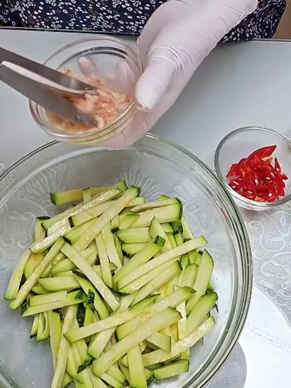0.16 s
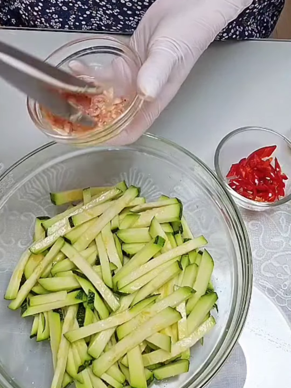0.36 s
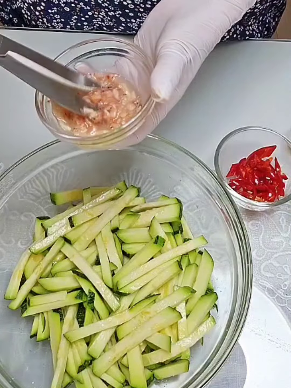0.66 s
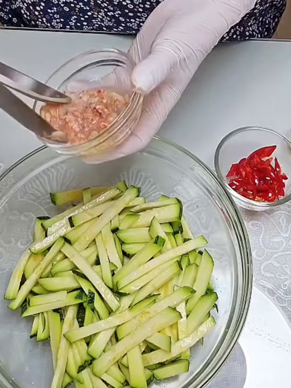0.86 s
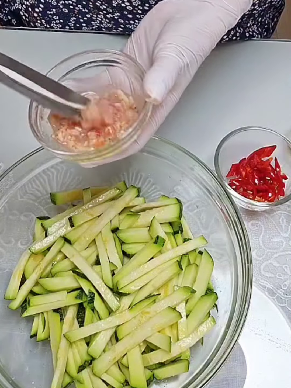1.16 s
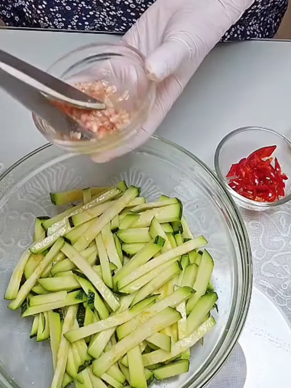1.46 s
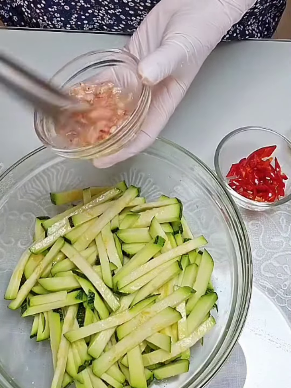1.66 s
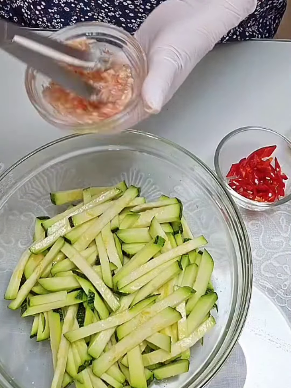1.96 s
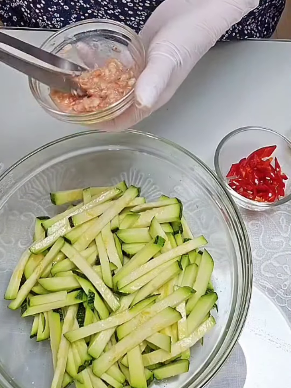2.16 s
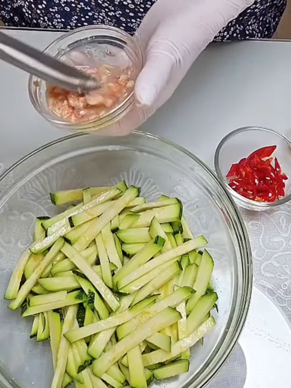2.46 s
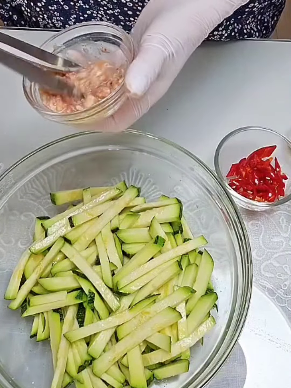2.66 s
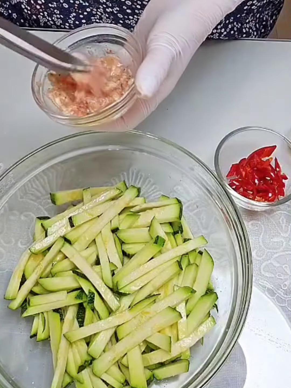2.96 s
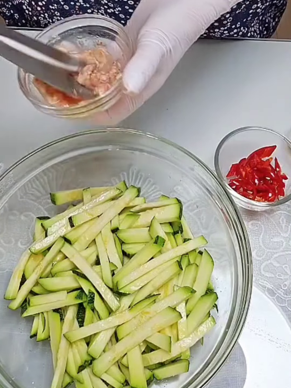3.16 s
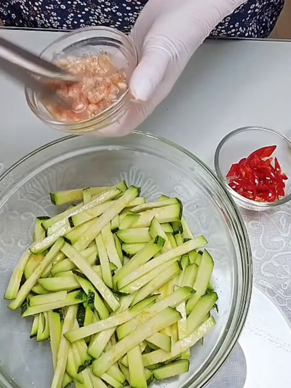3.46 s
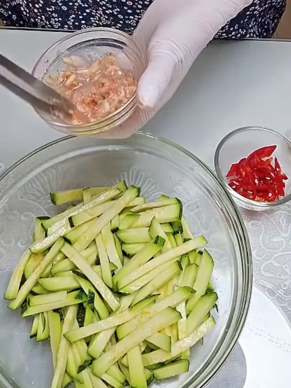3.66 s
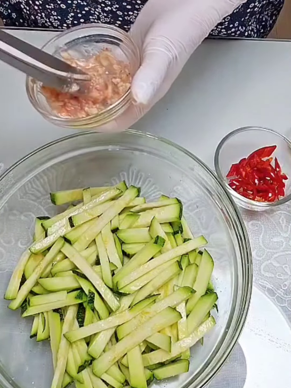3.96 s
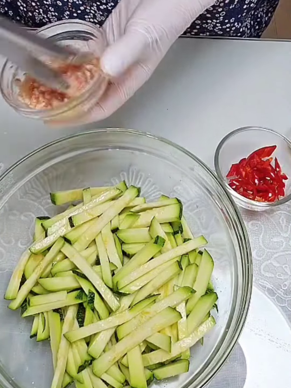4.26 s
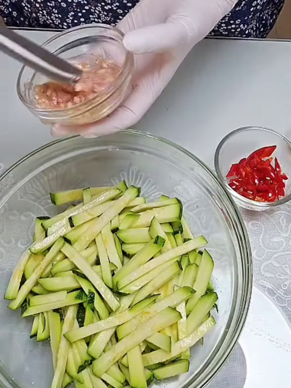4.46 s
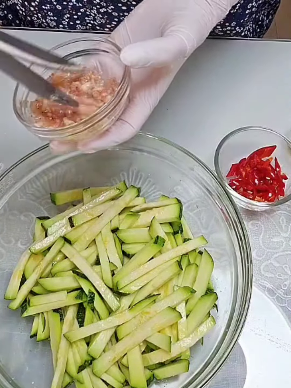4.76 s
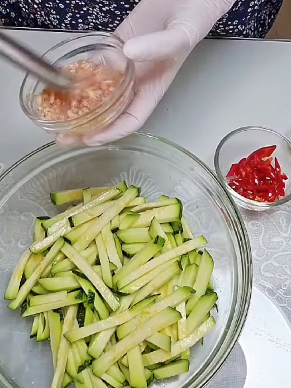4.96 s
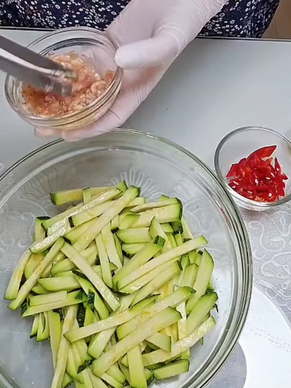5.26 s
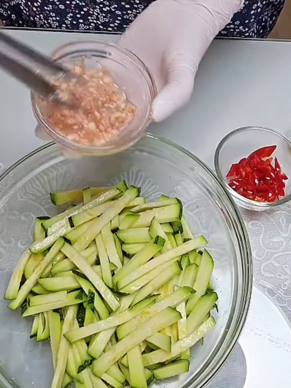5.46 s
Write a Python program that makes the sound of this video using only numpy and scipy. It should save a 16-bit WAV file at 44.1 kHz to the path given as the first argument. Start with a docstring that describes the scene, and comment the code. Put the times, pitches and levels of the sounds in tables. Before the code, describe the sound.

Close, dry, grainy scissor strokes in a hand-held glass bowl, a few bright glass taps, over quiet kitchen room noise and faint low hum.

```python
"""In a kitchen, close up, scissors snip quickly through wet minced food in a small hand-held glass bowl.
Each stroke is a short burst of grainy noise, coloured as steel and partly as damped glass modes.
Now and then a blade tip clinks on the glass: a tap, noisy chatter, a thud in the palm and a room wash.
Faint stirring fills in; a low appliance hum wavers over room noise with a dull band and a thin whistle."""
import sys
import numpy as np
from scipy import signal
from scipy.fft import rfft, irfft
from scipy.io import wavfile
from scipy.ndimage import uniform_filter1d

SR = 44100
rng = np.random.default_rng(int(sys.argv[2]) if len(sys.argv) > 2 else 0)


def voltage_ratio(level):
    """Linear amplitude factor for a level in decibels (scalar or array-like)."""
    return 10 ** (np.asarray(level, float) / 20)


def waveform_to_disk(signal):
    """Save audio, clipped to [-1, 1], as 16-bit WAV at the path in sys.argv[1]."""
    frames = np.transpose(np.atleast_2d(signal))
    scaled = np.clip(frames, -1, 1) * 32767
    samples = np.round(scaled).astype(np.int16)
    wavfile.write(sys.argv[1], SR, samples)


N = 247401
SIZE = 8192  # samples per touch
T = np.arange(SIZE) / SR
F = np.maximum(np.fft.rfftfreq(SIZE, 1 / SR), 1)


def snips():
    """Scissor strokes: fibres part and steel scrapes as the blades close."""
    # blade strokes: (half-rise time [s], nominal length [s], level [dB],
    # brightness before weighting [dB], glass ring [dB])
    strokes = [(0.0, 0.0075, -79, 3, -7), (0.12, 0.0096, -69, 9.5, -0.5), (0.295, .01, -75, -14.5, -7),
               (0.303, 0.033, -81.5, -16, 1.5), (0.355, .008, -75.5, 8, 1.5), (.368, 0.0062, -71.5, 4, -14),
               (.415, 0.014, -70.5, 1, -16), (.45, 0.022, -72.5, 5, -11), (0.503, 0.022, -57, 2.5, 9),
               (0.539, 0.012, -71.5, -2.5, -20), (0.596, 0.0089, -74, 1.5, -14),
               (0.614, 0.018, -74, 3, -16), (0.687, 0.022, -75, -2.5, -22), (0.725, 0.018, -79.5, 2, -11),
               (0.788, 0.03, -78.5, -2.5, -17), (0.828, 0.038, -78.5, 1.5, -17),
               (0.876, 0.019, -63.5, -2.5, 7.5), (0.9, .011, -74, -7.5, -18), (0.99, 0.024, -78.5, 2, -14),
               (1.064, .019, -70, 2.5, -25), (1.153, 0.034, -63, -2.5, -1), (1.197, .031, -72.5, 5.5, -11),
               (1.273, 0.031, -83, -13.5, 5), (1.299, 0.0062, -67, -2.5, -14),
               (1.386, 0.031, -66.5, -14.5, 2), (1.452, 0.024, -78.5, 0, -12), (1.503, 0.023, -74, -5, -7),
               (1.551, 0.039, -81.5, 1, -14), (1.593, 0.023, -65, -3.5, -1), (1.617, 0.029, -65, -3.5, -27),
               (1.679, 0.038, -61, -2.5, 7), (1.791, 0.029, -81, -2, -14), (1.88, 0.05, -75.5, -3, -7),
               (1.922, 0.021, -73.5, 8, -19), (1.989, 0.043, -65, -6.5, -4.5), (2.038, 0.013, -69, 6, -3.5),
               (2.233, 0.032, -71.5, 0.5, -27), (2.287, 0.029, -65.5, -9, -25),
               (2.324, 0.033, -74, -3, -11), (2.442, 0.025, -82, -11, -6), (2.49, 0.0083, -69, 7, -3),
               (2.547, 0.028, -68.5, -4, -27), (2.59, .032, -78, 0, -17), (2.64, 0.028, -65.5, -1, -0.5),
               (2.687, 0.026, -77, 0.5, -11), (2.733, 0.024, -78, 4, -14), (2.803, 0.014, -71, -11, -1),
               (2.861, 0.0089, -69, 6, -14), (2.935, 0.029, -80.5, -3, -13), (2.99, 0.026, -83.5, 1, -20),
               (3.061, 0.043, -80, -3.5, -18), (3.104, 0.019, -69, 12, 4.5), (3.173, 0.029, -60, -2.5, -3),
               (3.227, .009, -76.5, 4, -4), (3.296, 0.019, -83, -14, -13), (3.336, 0.016, -78, 4.5, -10),
               (3.408, 0.03, -66.5, -6.5, -4.5), (3.455, 0.013, -75.5, 8, -11),
               (3.526, 0.027, -73, -8.5, 6), (3.659, 0.024, -47, -3.5, 6), (3.686, 0.023, -61.5, -3, -11),
               (3.804, .045, -74, -10.5, -19), (3.863, 0.014, -79, 5.5, -16),
               (3.916, 0.028, -58.5, -6.5, -7.5), (3.96, .032, -74.5, 6, -2), (4.008, 0.029, -65, -1, 6.5),
               (4.038, 0.034, -67, -4.5, -1), (4.181, 0.014, -71, -8.5, 2), (4.277, 0.02, -89, -13, 9),
               (4.311, 0.022, -74, -1.5, -12), (4.359, 0.025, -83, 3, -10), (4.427, .025, -64.5, -1.5, -3),
               (4.498, 0.018, -75.5, 2, -17), (4.584, 0.022, -74, -2, -18), (4.684, 0.028, -69.5, -7, 2),
               (4.713, .016, -73, 1, -8.5), (4.828, 0.033, -81.5, 2, -18), (4.874, 0.015, -77.5, 6, -14),
               (4.914, 0.029, -57, -0.5, 8), (4.947, 0.03, -68, -3, -19), (5.079, 0.018, -73.5, -6, 0),
               (5.17, 0.021, -74, 0.5, 7.5), (5.263, 0.023, -83.5, 6, -12),
               (5.335, 0.019, -74.5, -1.5, -4.5)]
    out = np.zeros(N)
    for s, length_s, db, bright_db, glass_db in strokes:
        add_stroke(out, s, length_s, db, bright_db, glass_db)
    return out


def stirring():
    """Faint stirring of the food: weak strokes spread evenly with random jitter."""
    count = 50
    out = np.zeros(N)
    for i in range(count):
        s = (i + rng.random()) * N / SR / count
        db = -87 + 3 * rng.standard_normal()
        bright_db = 2.7 + 3 * rng.standard_normal()
        add_stroke(out, s, 0.025, db, bright_db, glass_db=-17.5)
    return out


def add_stroke(out, s, length_s, db, bright_db, glass_db):
    """Dense tiny ticks, as noise with a stepped level; pressure swells, then lets go."""
    grain = int(0.00075 * SR)
    ticks = rng.standard_normal(SIZE)
    ticks = ticks * voltage_ratio(0.5 * np.repeat(rng.standard_normal(SIZE), grain)[:SIZE])
    ticks = ticks * voltage_ratio(3.5 * np.repeat(rng.standard_normal(SIZE // 128), 128))  # clumps
    lead_s, swell_s = 0.26 * length_s, 0.53 * length_s
    fall_s = 0.0087 + 0.28 * length_s
    arch = np.sin(np.pi / 2 * np.clip(T / (2 * lead_s), 0, 1)) ** 2
    pressure = arch * np.exp(-np.maximum(T - lead_s - swell_s, 0) ** 2 / fall_s ** 2)
    hard_db = db + 57.5
    # where the glass rings, both ends of the scrape sink
    ends_db = -1.0 - 0.7 * max(glass_db + 2.5, 0)
    # hard strokes stir the 9 kHz shape
    third_db = -6.5 + 1.26 * max(hard_db, 0) + 0.3 * bright_db
    scrape, ring = contact(ends_db - 1.16 * bright_db, ends_db + 1.12 * bright_db, glass_db, third_db,
                           follow=0.1, scatter_db=4.5, hollow_db=1.5)
    # a hard stroke also rocks the bowl in the palm
    rock = voltage_ratio(-16.5 + 0.73 * hard_db) * rfft(unit(irfft(palm(550, 0.4))))
    source = rfft(ticks / ticks.std() * pressure)
    add(out, s - lead_s, voltage_ratio(db) * irfft(source * (scrape + ring + rock)))


def clinks():
    """Blade tip on glass: tap and chatter; a longer set wash time gives longer chatter, louder wash."""
    # blade-tip blows: (time [s], level as if 1 ms long [dB], low knock [dB], top hiss [dB],
    # glass ring [dB], t60 of the wash, also sets the chatter [s])
    blows = [(0.3036, -57, 10, -19, -3, 0.091), (2.0889, -68.5, 1.5, -26, 15.5, 0.08),
             (2.235, -62.5, -3, 10, -12, 0.063), (2.423, -35.5, 7.5, -14, -27, 0.076),
             (2.801, -53.5, 7.5, -0.5, 0, 0.11), (3.8432, -67, 16.5, -4, -11, 0.045),
             (4.179, -54.5, 0.5, -6.5, -6, 0.064), (4.2764, -76, 20.5, -23, 12, 0.15),
             (4.401, -26.5, -16.5, -17, 2.5, 0.055), (5.441, -28.5, -2.5, -6.5, 7, .068),
             (5.486, -24.5, -1, 4.5, 7.5, 0.31)]
    out = np.zeros(N)
    for s, db, low_db, top_db, glass_db, t60_s in blows:
        third_db = -4.0 + 0.45 * glass_db - 0.25 * top_db  # a ringing, dull blow favours 9 kHz
        chatter_s = 0.0077 * np.sqrt(t60_s)
        rattle = rng.standard_normal(SIZE) * (1 - np.exp(-T / 0.0011)) * np.exp(-T / chatter_s)
        rattle = rfft(unit(rattle))
        scrape, ring = contact(low_db, top_db, glass_db, third_db,
                               follow=0.4, scatter_db=1.5, hollow_db=2.0)
        # the tap rings the glass; the chatter after it is mostly steel noise
        steel = irfft((0.95 + rattle) * scrape)
        glass = irfft((1 + 0.46 * rattle) * ring)
        thud = unit(irfft((1 + rattle) * palm(200, 0.53)))
        steel = steel + voltage_ratio(-22 + 0.39 * low_db) * thud
        echo = room_wash(glass + 0.83 * steel, t60_s)
        add(out, s, voltage_ratio(db) * np.sqrt(0.001 * SR) * (steel + glass + echo))
    return out


def room_wash(sound, t60_s):
    """Kitchen reverberation: convolution with noise that builds up, then decays exponentially."""
    wash = rng.standard_normal(SIZE) * (1 - np.exp(-T / 0.013)) * 1000. ** (-T / t60_s)
    wash = unit(wash * np.clip(6 * (1 - T / T[-1]), 0, 1))  # fade the end
    gain = voltage_ratio(-7) * (t60_s / 0.27) ** (1.33 / 2)  # a longer wash is louder
    return gain * signal.fftconvolve(sound, wash)[:SIZE]


def contact(low_db, top_db, glass_db, third_db, follow, scatter_db, hollow_db):
    """Spectra of one touch: broad steel scrape and damped bowl modes, varied at random each time."""
    # colour of steel scraping inside the bowl: (frequency [Hz], gain [dB])
    steel_colour = [(200, -16.5), (500, -4), (950, -1), (1250, 0.5), (1550, 4), (2250, 3.5), (2720, -1),
                    (3200, 3), (4800, 8), (5700, 4), (6600, -1.5), (7500, 3), (8500, 9.5), (11400, -2),
                    (14500, 4.5), (15700, 3.5), (16100, -51.5)]
    # glass bowl, each ring shape a close group that dies away quickly: (nominal frequency [Hz], nominal level
    # [dB], t60 before scaling [s])
    modes = [(1760, -13, .03), (1975, -7, .05), (2017, -6, .07), (2290, -5, .025), (3500, -5, .02),
             (4872, -4, .045), (4925, 0, .07), (5038, -3, .045), (6620, -10, .03), (8420, -7, .025),
             (8780, -3, .04), (8865, 0, .065), (10940, -14, .03), (13590, -3, .05), (13653, -4, .065),
             (13760, -8, .035)]
    tilt = curve([(2600, low_db), (3100, 0.0048), (6500, 0.017), (9300, 0.98 * top_db), (12000, top_db)], F)
    # random bumps and dips vary the colour of each touch
    bumps_db = hollow_db * rng.standard_normal(36)
    ripple = curve(np.transpose([np.geomspace(300, 16000, num=36), bumps_db]), F)
    scrape = curve(steel_colour, F) * tilt * ripple
    middle = scrape[(F > 3000) & (F < 7500)]
    scrape = scrape / np.sqrt(2 * np.sum(middle ** 2) / SIZE)
    hz, db, t60_s = np.transpose(modes)[:, :, None]
    # each ring shape's pitch and decay vary a little at random
    hz = hz * (1 + 0.003 * rng.standard_normal(hz.shape))
    t60_s = 0.75 * t60_s * voltage_ratio(2.5 * rng.standard_normal(hz.shape))
    # the spot touched decides how much each ring shape is stirred
    spot = curve([(2400, follow * low_db), (3400, 0), (6800, 0), (8300, third_db), (11000, third_db),
                  (13500, 0.75 * top_db)], hz)
    gain = spot * voltage_ratio(db + scatter_db * rng.standard_normal(db.shape))
    ring = np.sum(gain * np.sin(2 * np.pi * hz * T) * 1000. ** (-T / t60_s), axis=0)
    ring = ring * (1 - np.exp(-T / 0.00095))  # the glass takes a few cycles to start
    ring = ring * (1 + 1.5 * np.exp(-T / 0.004))  # wet food soaks up the first loud swing fast
    return causal(scrape), voltage_ratio(glass_db) * rfft(unit(ring))


def palm(hz, log_width):
    """Spectrum of the bowl moving in the palm: one broad hump on a log-frequency axis."""
    return causal(np.exp(-np.log(F / hz) ** 2 / log_width ** 2))


def causal(gain):
    """Minimum-phase spectrum with this gain, so nothing sounds before the touch."""
    cep = irfft(np.log(gain + 1e-9))
    cep[1:SIZE // 2] *= 2
    cep[SIZE // 2 + 1:] = 0
    return np.exp(rfft(cep))


def curve(points, hz):
    """Gain of (Hz, dB) points joined on a log-frequency axis."""
    f, db = np.transpose(points)
    return voltage_ratio(np.interp(np.log(hz), np.log(f), db))


def unit(x):
    """Scales to unit energy."""
    return x / np.sqrt(np.sum(x ** 2))


def walk(rate_hz):
    """Random levels held 1 / rate_hz s and smoothed twice; standard deviation near 0.5."""
    k = int(SR / rate_hz)
    held = np.repeat(rng.standard_normal(N // k + 1), k)
    return 0.66 * uniform_filter1d(uniform_filter1d(held, k), k)[:N]


def add(out, s, sound):
    """Mixes one touch in at s seconds, cut at the end of the scene."""
    i = int(max(s, 0) * SR)
    out[i:i + SIZE] += sound[:N - i]


def hum():
    """Appliance hum: a low tone that throbs unevenly, swells, sinks and drifts, in a little rumble."""
    # hum before waver and throb: (time [s], level [dB])
    hum_levels = [(0.0, -62), (0.64, -59), (0.67, -69.5), (1.11, -54), (1.29, -69.5), (1.55, -53),
                  (1.64, -81), (1.67, -58.5), (3.84, -62), (4.0, -44.5), (4.05, -73.5), (4.3, -61),
                  (4.37, -45.5), (4.48, -63), (5.14, -62), (5.26, -77.5), (5.53, -52.5), (5.61, -66)]
    db = np.interp(np.arange(N) / SR, *np.transpose(hum_levels)) + 2.5 * walk(9.11)
    throb_hz = 11 * (1 + 0.798 * walk(6.5))
    throb = 1 + 0.64 * np.cos(2 * np.pi * np.cumsum(throb_hz) / SR)
    hz = 55 + 1.6 * walk(8)
    tone = np.sqrt(2) * voltage_ratio(db) * throb * np.sin(2 * np.pi * np.cumsum(hz) / SR)
    low_band = signal.butter(2, [30, 80], "band", fs=SR, output="sos")
    rumble = signal.sosfilt(low_band, rng.standard_normal(N))
    return tone + voltage_ratio(-74) * rumble / rumble.std()


def kitchen():
    """Room noise: shaped noise, a drifting dull band, and a faint whistle of narrow-band noise."""
    # colour of the room noise: (frequency [Hz], relative gain [dB])
    air_colour = [(50, -28.5), (85, -13), (125, -7), (190, -14), (500, -21.5), (750, -30), (1000, -39),
                  (1350, -38.5), (2500, -45), (4000, -43), (6500, -47.5), (9000, -46.5), (11500, -51.5),
                  (15600, -44.5), (16000, -66)]
    # dull band before drift: (time [s], level [dB])
    drone_levels = [(0, -83), (.74, -79.5), (1.43, -83), (3.14, -84.5), (4.4, -93), (5.6, -103.5)]
    hz = np.maximum(np.fft.rfftfreq(N, 1 / SR), 1)
    air = shaped_noise(curve(air_colour, hz))
    drone = shaped_noise(np.exp(-((hz - 900) / 300) ** 2))
    whistle = shaped_noise(np.exp(-((hz - 5200) / 130) ** 2))
    air_db = -68.5 + 1.1 * walk(2.2)
    drone_db = np.interp(np.arange(N) / SR, *np.transpose(drone_levels)) + 4.2 * walk(8)
    whistle_db = -89 + 5.5 * walk(7) + 3.5 * walk(18)
    return voltage_ratio(air_db) * air + voltage_ratio(drone_db) * drone + voltage_ratio(whistle_db) * whistle


def shaped_noise(gain):
    """Gaussian noise with this spectral gain, scaled to unit standard deviation."""
    x = irfft(rfft(rng.standard_normal(N)) * gain, N)
    return x / x.std()


def scene():
    """Sum of all layers, one channel."""
    return (snips() + stirring() + clinks() + hum() + kitchen())[None]


def roll_off(x):
    """The treble ends steeply here."""
    return signal.sosfilt(signal.butter(12, 16860, fs=SR, output="sos"), x)


def record(dry):
    """The phone dulls the very top with a 16 kHz low-pass."""
    top = signal.butter(4, 16000, fs=SR, output="sos")
    mix = signal.sosfilt(top, dry)
    return roll_off(mix)


dry = scene()
out = record(dry)
waveform_to_disk(out)
```